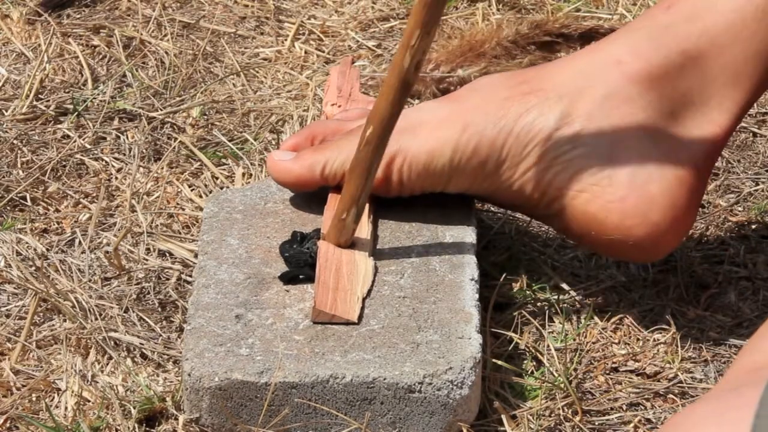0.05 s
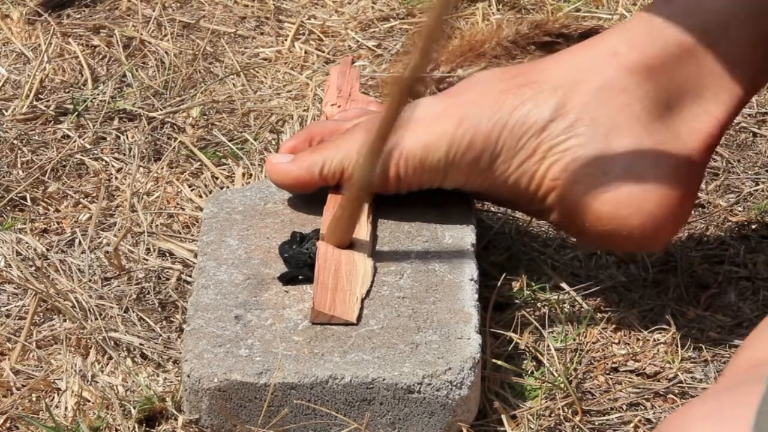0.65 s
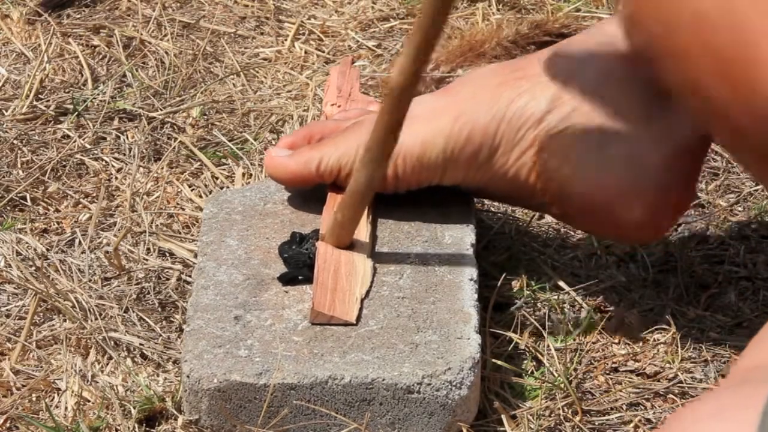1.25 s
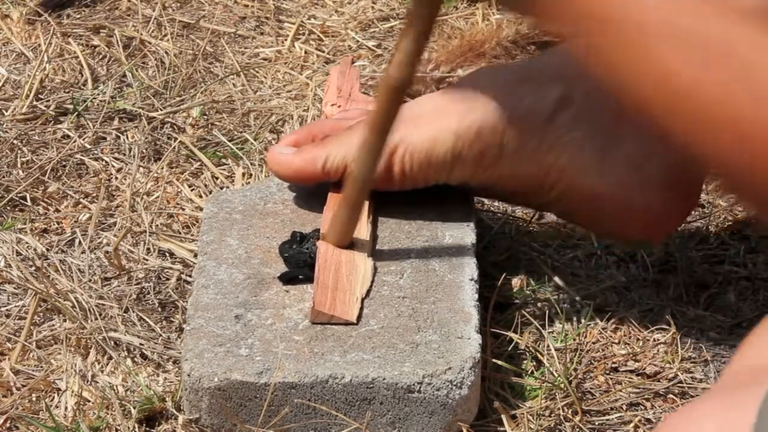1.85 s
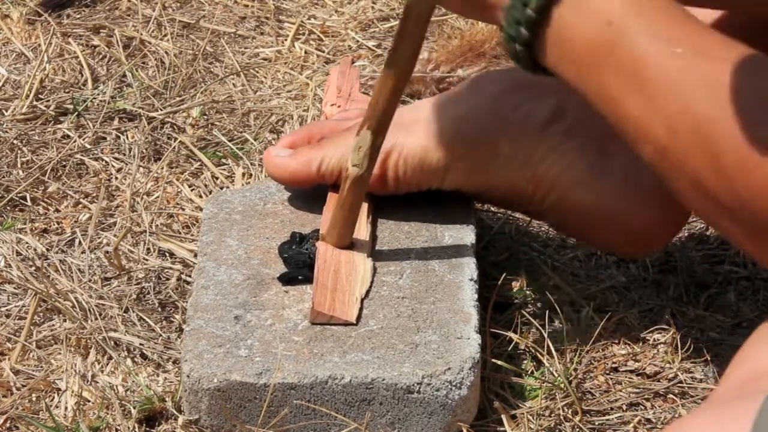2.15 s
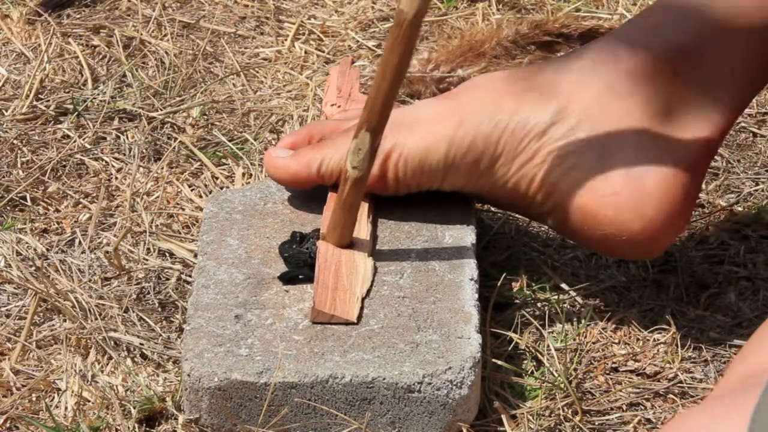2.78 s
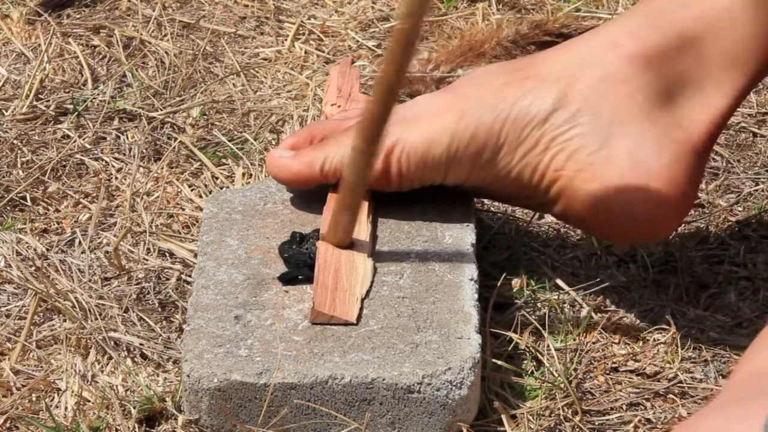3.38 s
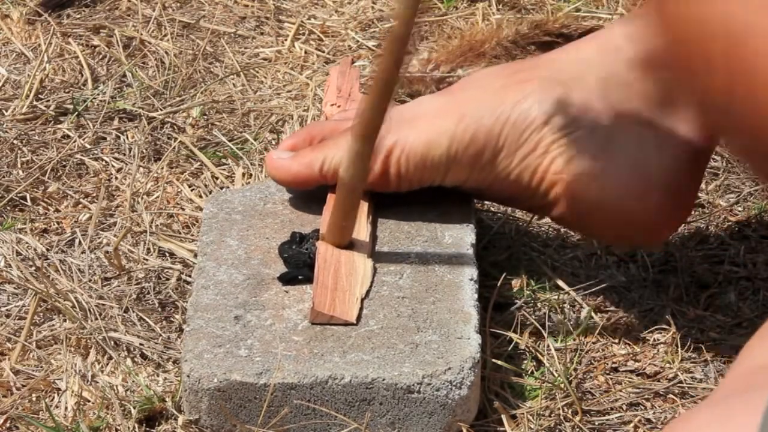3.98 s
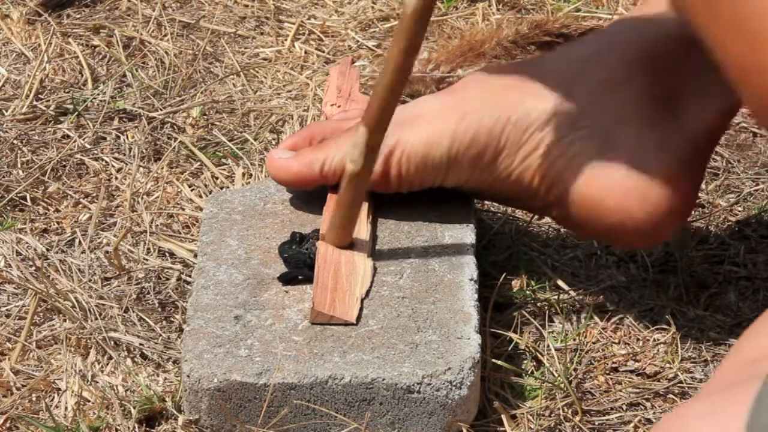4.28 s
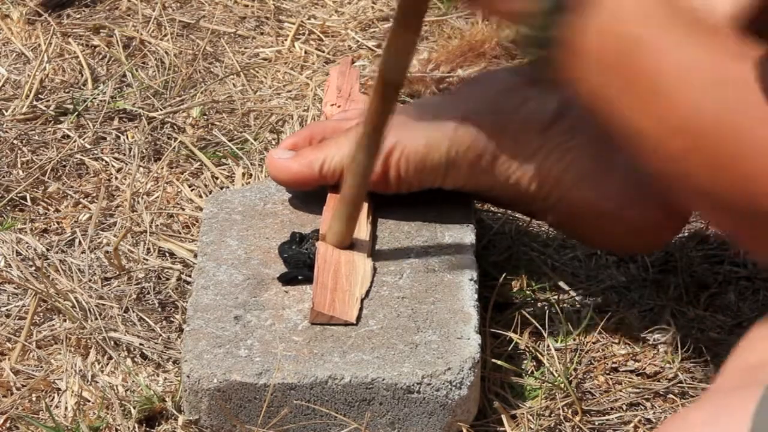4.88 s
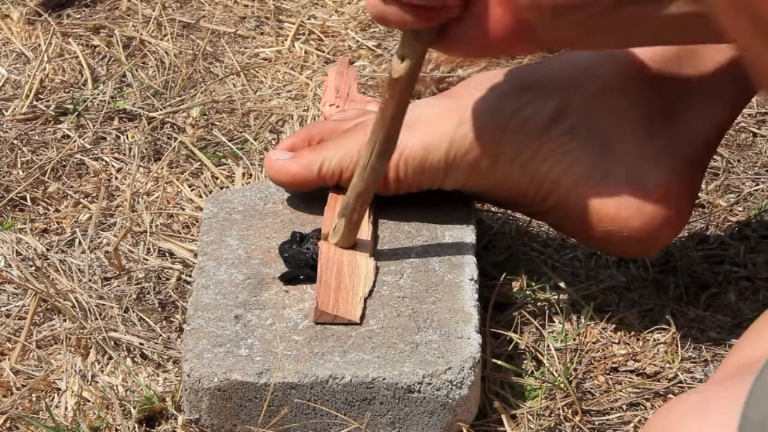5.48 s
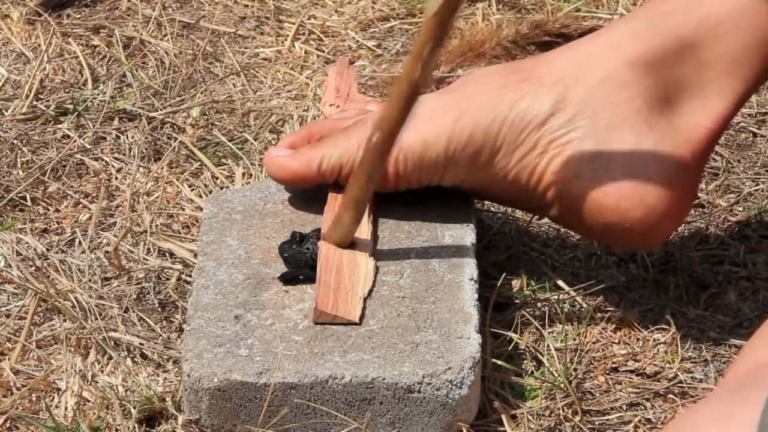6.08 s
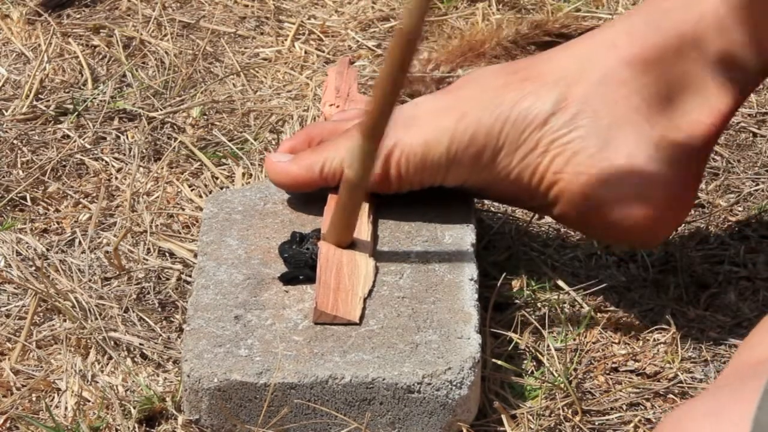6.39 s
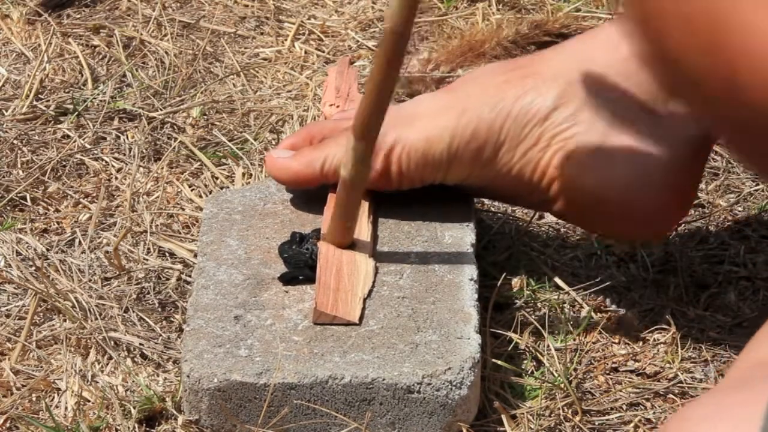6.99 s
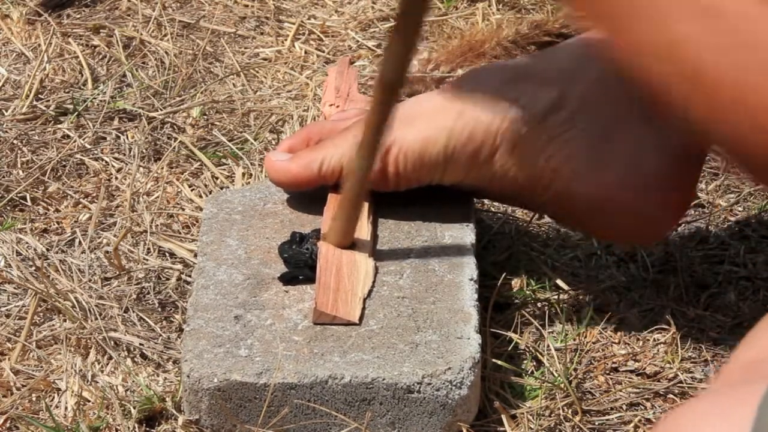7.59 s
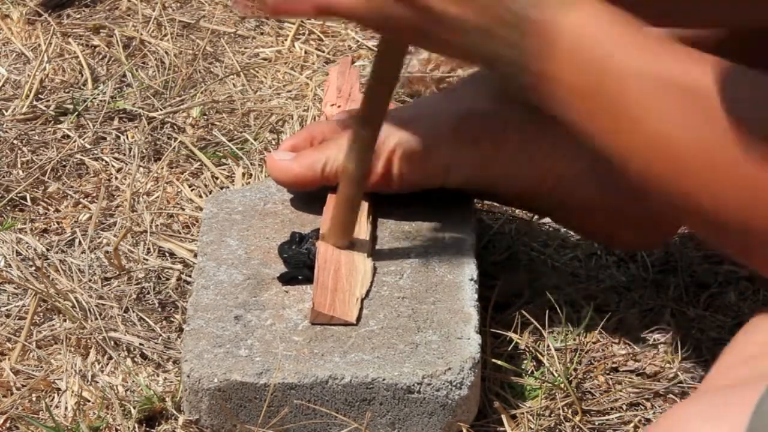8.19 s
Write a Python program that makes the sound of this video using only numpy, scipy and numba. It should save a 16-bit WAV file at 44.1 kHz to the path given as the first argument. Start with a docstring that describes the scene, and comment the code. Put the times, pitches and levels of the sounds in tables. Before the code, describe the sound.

Fast, dry, rhythmic scraping of a stick twirled in a wooden board outdoors, pausing twice, with small squeaks, sharp clicks and low rumble.

```python
"""A hand drill: dry palms roll a wooden spindle to and fro in a hearth board, about ten strokes a second.
Stick-slip friction in the socket rasps, hisses through wood dust and excites the modes of the spindle.
Three passes run down the stick, with pauses while the hands move back up; the socket squeaks, and the
tip snaps at some of the turns. Outdoors, distant traffic rumbles, and a few soft bumps come in the
second pause. One close microphone with automatic gain picks it all up."""
import sys
import numpy as np
from scipy import signal
from scipy.fft import rfft, irfft, next_fast_len
from scipy.io import wavfile
from scipy.ndimage import uniform_filter1d
from numba import njit

SR = 44100
rng = np.random.default_rng(int(sys.argv[2]) if len(sys.argv) > 2 else 0)


def wav_record(signal):
    """Record a signal, one row per channel, as 16-bit PCM in the file named by sys.argv[1]."""
    frames = np.transpose(np.atleast_2d(signal))
    bounded = np.clip(frames, -1, 1)
    # unit amplitude maps onto the largest positive 16-bit level
    quanta = np.round(bounded * 32767).astype(np.int16)
    wavfile.write(sys.argv[1], SR, quanta)


N = 363825


def from_db(db):
    """Amplitude ratio of a level in decibels."""
    return 10 ** (np.asarray(db) / 20)


def unit_rms(x):
    """Normalisation to an rms of one."""
    return x / np.sqrt(np.mean(x ** 2) + 1e-20)


def drift(rate_hz):
    """Random modulation: low-pass noise of unit rms, drawn at every 32nd sample."""
    count = next_fast_len(N // 32 + 2)
    hz = np.fft.rfftfreq(count, 32 / SR)
    slow = irfft(rfft(rng.standard_normal(count)) * (hz > 0) / (1 + (hz / rate_hz) ** 2), count)
    return np.interp(np.arange(N) / 32, np.arange(count), unit_rms(slow))


def colour(x, spectrum):
    """Spectral shaping by (frequency [Hz], level [dB]) points, rolling off beyond the ends; unit rms."""
    points_hz, db = np.transpose(spectrum)
    size = next_fast_len(len(x))
    hz = np.fft.rfftfreq(size, 1 / SR) + 1e-3
    roll_off = np.minimum(1, hz / points_hz[0]) ** 2 * np.minimum(1, points_hz[-1] / hz) ** 2
    gain = from_db(np.interp(np.log(hz), np.log(points_hz), db)) * roll_off
    return unit_rms(irfft(rfft(x, size) * gain, size)[:len(x)])


def resonate(x, hz, width_hz):
    """Second-order resonance with unit peak gain."""
    r = np.exp(-np.pi * width_hz / SR)
    gain = (1 - r * r) / 2
    return signal.lfilter([gain, 0, -gain], [1, -2 * r * np.cos(2 * np.pi * hz / SR), r * r], x)


def decay(t, t60):
    """Exponential damping: 60 dB down after t60 seconds."""
    return np.exp(-np.log(1000) * t / t60)


def ring(t, hz, t60):
    """Free vibration of one damped mode."""
    return np.sin(2 * np.pi * hz * t) * decay(t, t60)


def add(out, sound, start):
    """Superposition of a sound from a start time in seconds."""
    at = max(0, round(start * SR))
    out[at:at + len(sound)] += sound[:max(0, N - at)]


# Level of the outdoor rumble and tyre noise, with a brief low gust near 0.8 s:
# (time [s], rumble level [dB], tyre level [dB])
OUTDOOR_LEVELS = [(0, -40.5, -47.5), (0.5, -42, -48), (0.8, -36.5, -48), (1.2, -41.5, -48),
                  (2.3, -42.5, -51), (5.1, -40.3, -45), (5.9, -40.5, -48.5), (8.25, -40, -44)]
# Spectra of rumble, tyres and open air: (frequency [Hz], relative spectral level [dB])
RUMBLE_SPECTRUM = [(12, -32), (20, -19.5), (60, 0.5), (81, 2), (167, -4), (184, -5), (216, -13), (249, -11),
                   (297, -18.5), (330, -18), (430, -33.5), (730, -120)]
TYRE_SPECTRUM = [(200, -16), (350, 2.5), (450, 1.5), (800, 1.5), (1100, -1.5), (1600, -4.5), (2500, -6.5),
                 (5000, -13.5)]
AIR_SPECTRUM = [(1000, 5), (2500, -3.5), (5000, 0), (8500, 0.5), (10000, -11), (12000, -15), (15700, -20)]
# Tones of far engines: (start [s], end [s], frequency [Hz], level [dB])
ENGINES = [(2.95, 3.4, 105, -41.5), (7.65, 8.25, 177, -41), (1.7, 7.8, 350, -62.5), (0.99, 4.1, 415, -62.5),
           (6.2, 7.4, 69, -51)]


def outdoors(noise_db=1.5, air_db=-48.5, waver_hz=2.63, throb_db=3.5):
    """Incoherent sources add: low rumble, tyre noise, modulated engine tones and a faint even hiss."""
    t = np.arange(N) / SR
    times, rumble_db, tyre_db = np.transpose(OUTDOOR_LEVELS)
    out = np.zeros(N)
    for levels_db, spectrum in (rumble_db, RUMBLE_SPECTRUM), (tyre_db, TYRE_SPECTRUM):
        noise = colour(rng.standard_normal(N), spectrum)
        out += from_db(np.interp(t, times, levels_db) + noise_db) * noise
    waver = waver_hz * drift(6.7)
    throb = from_db(throb_db * drift(18))
    for start, end, hz, db in ENGINES:
        progress = np.clip((t - start) / (end - start), 0, 1)
        swell = np.sqrt(np.abs(np.sin(np.pi * progress)))
        tone = np.sqrt(2) * np.sin(2 * np.pi * np.cumsum(hz + waver) / SR)
        out += from_db(db) * swell * throb * tone
    return out + from_db(air_db) * colour(rng.standard_normal(N), AIR_SPECTRUM)


# Soft thuds: (time [s], level [dB], frequency [Hz], 60 dB decay time [s])
THUDS = [(5.048, -15, 89, .05), (5.1216, -10, 190, 0.029), (5.138, -11, 81, 0.072), (5.177, -23, 136, 0.17),
         (5.255, -17.5, 171, 0.054), (5.276, -12, 130, 0.043), (5.321, -23, 109, 0.096)]


def bumps(bump_db=-2.0, scuff_db=-15.5, cutoff_hz=420):
    """Heavy damping: each dull thud is one low mode that dies away together with a soft scuff."""
    out, t = np.zeros(N), np.arange(SR // 5) / SR
    for start, db, hz, t60 in THUDS:
        scuff = unit_rms(resonate(rng.standard_normal(len(t)), hz=250, width_hz=220)) * decay(t, t60)
        add(out, from_db(db + bump_db) * (ring(t, hz, t60) + from_db(scuff_db) * scuff), start)
    return signal.sosfilt(signal.butter(3, cutoff_hz, fs=SR, output="sos"), out + 1e-18)


# The socket bites hard: (centre time [s], frequency [Hz], level [dB])
SQUEAKS = [(0.479, 2300, -42), (0.598, 2150, -38.5), (0.69, 2030, -40.5), (0.98, 1030, -43),
           (1.175, 1100, -45), (1.76, 3470, -36), (1.794, 4260, -35), (3.384, 2470, -42), (3.40, 1710, -45),
           (3.50, 1760, -41), (3.564, 2390, -42), (3.801, 2600, -41.5), (3.991, 2530, -42),
           (4.08, 2360, -39.5)]


def squeaks(squeak_db=1.0, length_s=0.055, relative_width=0.11):
    """Frictional excitation: one mode of the spindle sings briefly, as a rough narrow band of noise."""
    out, swell = np.zeros(N), np.hanning(round(length_s * SR))
    for time, hz, db in SQUEAKS:
        band = resonate(rng.standard_normal(SR // 5), hz, hz * relative_width)
        band = resonate(band, hz, 2 * hz * relative_width)[-len(swell):]
        add(out, from_db(db + squeak_db) * swell * np.sqrt(2) * unit_rms(band), time - length_s / 2)
    return out


# Modes of tip and board: (frequency [Hz], relative level [dB], 60 dB decay time [s])
TIP_MODES = [(2540, -10, 0.0045), (5210, -5.5, 0.01), (5500, -1.5, 0.0032), (7500, -3, 0.0086),
             (10000, -1.5, 0.0018), (12700, -5.5, 0.0024)]
# Jumps of the tip: (time [s], level [dB], ring frequency [Hz], relative crack level [dB])
TIP_JUMPS = [(0.4539, -33, 5430, -5), (0.8372, -22, 5430, 19), (1.3678, -26, 4550, 0),
             (1.3771, -12.5, 7250, 13), (1.9259, -34, 7410, 3), (2.2535, -42, 6800, 5),
             (2.271, -31, 5370, -8), (2.3659, -34.5, 5900, -2), (2.7436, -34, 3730, 2),
             (2.9437, -38, 7200, 4), (3.9451, -25, 7190, 6), (4.87, -29.5, 7600, 12),
             (5.107, -32.5, 3900, 8), (5.6579, -31, 4600, 2), (5.9222, -37, 6590, 9),
             (6.1948, -24, 6940, 2), (6.3339, -17.5, 7200, 24), (7.1219, -24.5, 7200, -3),
             (7.2994, -15.5, 7440, 10), (7.3064, -25.5, 7200, 5), (7.3945, -24.5, 6930, -2),
             (7.4844, -22.5, 5330, 0)]


def snaps(snap_db=-1.0, ring_db=6.0, ring_t60=0.0072, splinter_t60=0.0086):
    """Impulsive excitation: the tip jumps in its socket, and a dry crack rings for milliseconds."""
    out, t = np.zeros(N), np.arange(SR // 50) / SR
    low_cut = signal.butter(2, 1800, "high", fs=SR, output="sos")   # a small source radiates lows poorly
    for start, db, ring_hz, crack_db in TIP_JUMPS:
        modes = sum((-1) ** k * from_db(mode_db + rng.normal()) * ring(t, hz, t60)
                    for k, (hz, mode_db, t60) in enumerate(TIP_MODES))
        splinter = colour(rng.standard_normal(len(t)), RASP_SPECTRUM) * decay(t, splinter_t60)
        crack = from_db(crack_db) * (modes + .5 * splinter)
        snap = signal.sosfilt(low_cut, crack - from_db(ring_db) * ring(t, ring_hz, ring_t60))
        add(out, from_db(db + snap_db) * snap / np.std(snap[:SR // 250]), start)
    return out


# Passes down the stick: (start [s], end [s], first level [dB], tiring [dB/s], dust [dB],
# push surge [dB], push lean [dB], pull surge [dB], pull lean [dB])
# Surge lifts the middle of a stroke; lean lifts its start and lowers its end as much.
HAND_PASSES = [(0.23, 2.102, -20, 4, 1.0, 4, -1.3, 1.8, 0.8),
               (3.11, 4.973, -24, 3.5, 1.0, -2, 0.7, -3, 1.5),
               (6.09, 8.25, -22, 4.5, -1.2, -1, 0.5, -1.5, 0.8)]
# Reversals of the palms, each starting a roll: (time [s], accent [dB])
REVERSALS = [(0.237, -1), (0.35, -2), (0.452, -1.5), (0.549, -1.5), (0.648, 0.0), (0.743, 0), (0.837, 2.5),
             (0.926, 1.5), (1.016, 2.0), (1.105, -0.5), (1.198, 1.5), (1.288, -0.5), (1.376, -1.5),
             (1.467, -2.5), (1.56, 0), (1.648, -1.5), (1.742, 0), (1.833, -0.5), (1.924, -1), (2.02, -3),
             (3.114, -3), (3.231, -1.5), (3.341, 1), (3.444, 1), (3.548, 0.0), (3.652, -0.5), (3.748, 0.5),
             (3.85, 0), (3.942, -2), (4.04, -0.5), (4.137, 1.5), (4.224, 0.0), (4.319, 1.5), (4.408, 0.0),
             (4.499, 0.5), (4.594, 0), (4.688, 1.5), (4.774, 0.0), (4.868, -3.5), (6.099, -3.5),
             (6.222, -1.5), (6.332, -1.5), (6.434, -2.5), (6.554, -0.5), (6.652, 1.5), (6.751, 1),
             (6.847, 0.5), (6.937, -2.0), (7.031, -1), (7.12, 2), (7.213, 0), (7.311, 4), (7.391, -0.5),
             (7.481, 0.5), (7.579, -0.5), (7.669, 0.5), (7.763, -1.0), (7.853, -0.5), (7.957, 0.5),
             (8.047, 0.5), (8.154, -1.5)]
# Slow twists as the hands settle: (start [s], end [s], level [dB], lean [dB], dust [dB])
SETTLING_TWISTS = [(0.005, 0.055, -49, -2, 3), (0.077, 0.234, -35.5, -2, 6.5), (2.38, 2.525, -56, -7, 0),
                   (2.947, 3.112, -36.5, -1.5, -1), (5.148, 5.428, -45.5, 3.5, 2.5),
                   (5.575, 5.747, -43, 1, 1), (5.898, 6.056, -38.5, -2.5, 2.5)]


def strokes(turn_s=0.0055, neutral_grip_db=-30, packing_db_per_db=0.44):
    """Reciprocating motion: push and pull alternate, and a firmer grip packs the dust and dulls it."""
    for first, last, first_db, tiring, pass_dust_db, *shape_db in HAND_PASSES:
        push_surge, push_lean, pull_surge, pull_lean = shape_db
        rolls = [(time, accent) for time, accent in REVERSALS if first - .05 < time < last - .05]
        ends = [time for time, _ in rolls[1:]] + [last]
        for k, ((start, accent_db), end) in enumerate(zip(rolls, ends)):
            level_db = first_db - tiring * (start - first) + accent_db
            dust_db = pass_dust_db + packing_db_per_db * (neutral_grip_db - level_db)
            # (surge [dB], lean [dB], dust [dB], dust lean [dB], catch [dB])
            push = (push_surge, push_lean, dust_db, 5, 0)      # starts bright
            pull = (pull_surge, pull_lean, dust_db, -7, 3.0)   # catches with a jerk, ends bright
            yield start + turn_s / 2, end - turn_s / 2, level_db, *(pull if k % 2 else push)
    for start, end, level_db, lean_db, dust_db in SETTLING_TWISTS:
        yield start, end, level_db, 0, lean_db, dust_db, 0, 0


def palms(breakaway=0.043, creep=0.089, catch_s=0.014, catch_width_s=0.0056,
          loose_grip_db=-28.5, damping_db_per_db=0.76):
    """Static friction yields, then the spin rises and falls as a sine; a firm grip damps the spindle."""
    speed, pressure, resonance_db, grit_db, progress = np.zeros((5, N))
    for start, end, level_db, surge_db, lean_db, dust_db, dust_lean_db, catch_db in strokes():
        span = slice(max(0, round(start * SR)), min(N, round(end * SR)))
        progress[span] = part = np.linspace(0, 1, len(progress[span]))
        speed[span] = np.abs(np.sin(np.pi * (breakaway + (1 - breakaway) * part)))
        jerk_db = catch_db * np.exp(-.5 * ((part * (end - start) - catch_s) / catch_width_s) ** 2)
        contour_db = np.interp(part, [.2, .5, .8], [lean_db, surge_db, -lean_db])
        pressure[span] = from_db(level_db + jerk_db + contour_db)
        resonance_db[span] = min(-0.5, damping_db_per_db * (loose_grip_db - level_db))
        grit_db[span] = dust_db + dust_lean_db * np.cos(np.pi * part)
    # the palms keep pressing and creeping through the turns
    pressure = np.maximum(pressure, uniform_filter1d(pressure, size=SR // 40))
    return np.hypot(speed, creep), pressure, resonance_db, grit_db, progress


def micro_slips(per_s, spread_db, chatter_db, chatter_hz):
    """Friction as shot noise: thousands of tiny slips a second, uneven in size and coming in clumps."""
    sizes = rng.standard_normal(N) * from_db(spread_db * np.clip(rng.standard_normal(N), -2, 2))
    slipping = rng.random(N) < per_s / SR
    return unit_rms(sizes * slipping * from_db(chatter_db * drift(chatter_hz)))


@njit
def gliding_resonance(x, angle, radius):
    """Time-varying resonator: its centre, in radians per sample, moves while it rings."""
    out, state = np.zeros(len(x)), 0j
    for i in range(len(x)):
        state = state * radius * complex(np.cos(angle[i]), np.sin(angle[i])) + (1 - radius) * x[i]
        out[i] = state.real
    return out


def turning_modes(drive, modes, speed, glide, wander_db, wander_hz):
    """Forced vibration at a moving contact: each mode glides and swells, while the total rms stays one."""
    out = 0
    for hz, width_hz, db in modes:
        centre_hz = hz * (1 + glide * np.clip(drift(wander_hz), -2.5, 2.5) * np.sqrt(speed))
        swell = from_db(db + wander_db * np.clip(drift(wander_hz), -2, 2))
        angle, radius = 2 * np.pi * centre_hz / SR, np.exp(-2 * np.pi * width_hz / SR)
        # filtering twice keeps the valleys between the modes deep
        out = out + swell * gliding_resonance(gliding_resonance(drive, angle, radius), angle, radius)
    return out / np.sqrt(uniform_filter1d(out ** 2, size=SR // 30) + 1e-12)


# Rasp of skin and wood, and hiss of the finest dust: (frequency [Hz], relative spectral level [dB])
RASP_SPECTRUM = [(500, -27.5), (1500, -23.5), (3000, -14), (4000, -13.5), (5200, -5.5), (6300, -2.5),
                 (7500, 1), (8900, -2), (9600, -7), (10400, -9.5), (11300, -21.5), (12400, -32),
                 (14000, -30), (15500, -37)]
DUST_SPECTRUM = [(8000, -15), (10400, 4), (11300, 3), (12400, 2.5), (14000, -5), (15500, -12)]
# Dry fibre modes and spindle bending modes: (frequency [Hz], bandwidth [Hz], relative level [dB])
FIBRE_MODES = [(6130, 520, -1), (6440, 240, 0), (6950, 200, 5.5), (8620, 530, 4), (8230, 250, -4)]
BENDING_MODES = [(1055, 204, -11.5), (1885, 166, -6.5), (2235, 190, -4), (2526, 140, 1), (2925, 216, -2.5),
                 (3365, 305, -2), (3877, 450, -1), (4383, 280, 1.5), (4916, 130, 1.5), (5356, 220, 3.5)]


def hand_drill(rasp_db=-2.0, fibre_db=-5.5, dust_db=-14.0, spindle_db=-9.0, build_up_db=5.5):
    """Stick-slip friction: noise grows with pressure and speed; the ring builds up through each roll."""
    speed, pressure, resonance_db, grit_db, progress = palms()
    slips = micro_slips(per_s=20000, spread_db=-2.7, chatter_db=2.08, chatter_hz=122)
    grinding = micro_slips(per_s=10000, spread_db=0.4, chatter_db=1.5, chatter_hz=90)
    powder = micro_slips(per_s=18000, spread_db=1.8, chatter_db=1.0, chatter_hz=110)
    # finer grit makes a roll sound higher
    fibre_modes = [(hz * (1 + 0.0096 * grit_db), width_hz, db) for hz, width_hz, db in FIBRE_MODES]
    fibres = turning_modes(grinding, fibre_modes, speed, glide=.05, wander_db=5.5, wander_hz=14)
    bending = turning_modes(grinding, BENDING_MODES, speed, glide=.03, wander_db=3.2, wander_hz=12)
    rasp = from_db(rasp_db) * colour(slips, RASP_SPECTRUM) + from_db(fibre_db) * fibres
    dust = from_db(dust_db + grit_db + 2 * drift(30)) * colour(powder, DUST_SPECTRUM)
    spindle = from_db(spindle_db + resonance_db + build_up_db * progress) * bending
    return pressure * (speed ** 0.97 * rasp + speed ** 1.1 * dust + speed ** 0.65 * spindle)


def scene():
    """Free field: the sources add without echo, and both channels carry the same sound."""
    return np.tile(hand_drill() + squeaks() + snaps() + bumps() + outdoors(), (2, 1))


def record(dry):
    """Automatic gain control: loud peaks duck the gain, which recovers slowly; the top is cut steeply."""
    threshold_db, excess_share, recovery_db_per_s, attack_s = -9.0, 0.58, 6.5, 0.011
    cutoff_hz = 15600
    excess_db = np.maximum(0, 20 * np.log10(np.abs(dry).max(axis=0) + 1e-9) - threshold_db)
    recovery_db = recovery_db_per_s * np.arange(N) / SR
    duck_db = np.maximum.accumulate(excess_share * excess_db + recovery_db) - recovery_db
    pole = np.exp(-1 / (attack_s * SR))
    ducked = dry * from_db(-signal.lfilter([1 - pole], [1, -pole], duck_db))
    return signal.sosfilt(signal.ellip(10, .1, 80, cutoff_hz, fs=SR, output="sos"), ducked)


dry = scene()
out = record(dry)
wav_record(out)
```